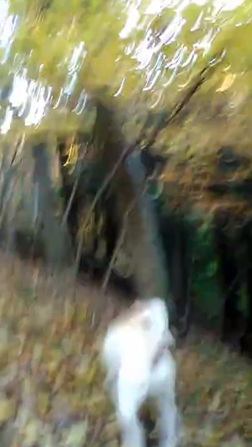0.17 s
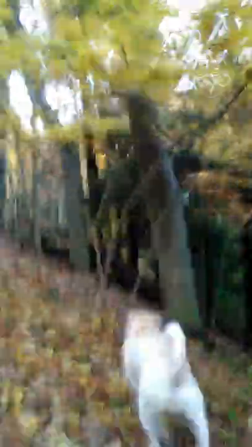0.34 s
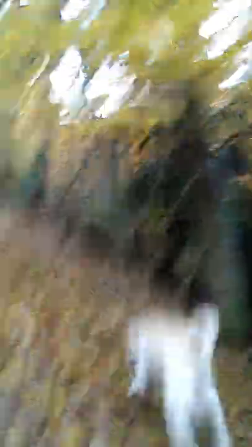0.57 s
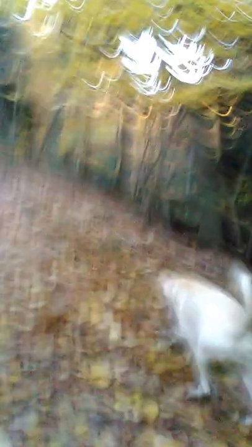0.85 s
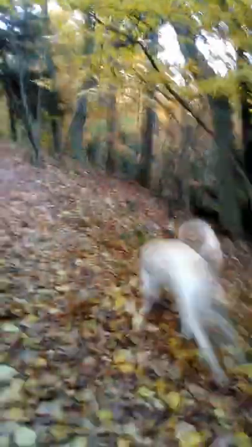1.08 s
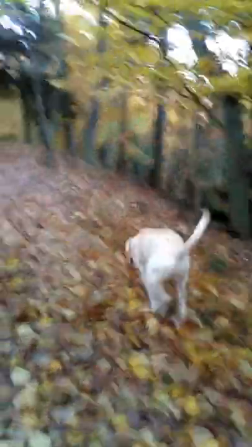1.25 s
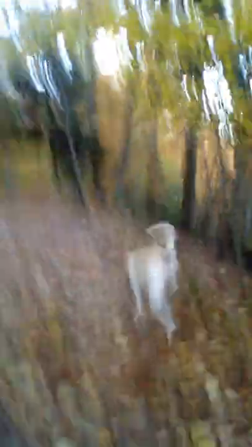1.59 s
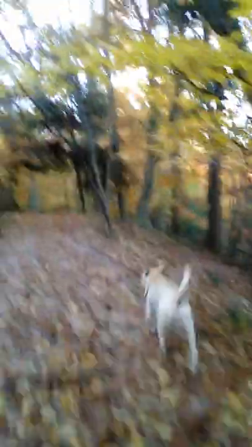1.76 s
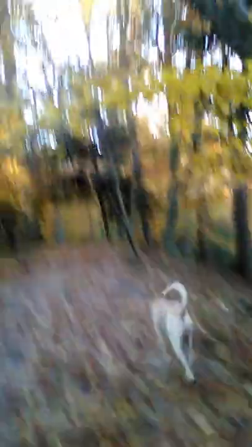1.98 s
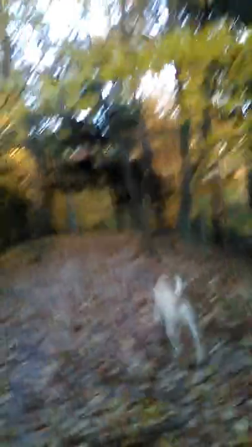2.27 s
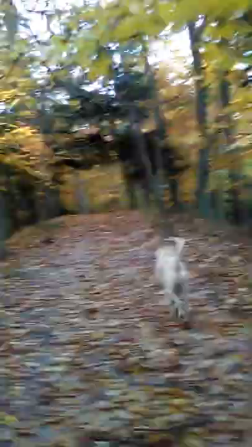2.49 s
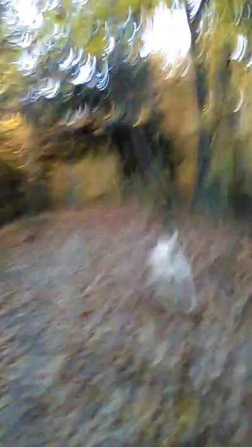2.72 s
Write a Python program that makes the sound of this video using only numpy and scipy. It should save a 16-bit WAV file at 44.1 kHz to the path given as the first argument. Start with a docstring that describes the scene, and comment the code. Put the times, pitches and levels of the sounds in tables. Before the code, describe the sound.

Someone walks briskly through crisp leaf litter outdoors, each step crackling and sliding; twigs tick, one snaps sharply, cloth rubs and squeaks near the end, all close to a handheld camera microphone with little background.

```python
"""On a woodland path, a walker treads through dry fallen leaves with a small camera in hand.
Each footfall crushes and drags leaves: a swell of tiny clicks, short rings and sliding noise.
Twigs tick as short pitched noise, and one snaps close by in a run of clicks.
Something, probably a sleeve, rubs in grainy strokes and squeaks; a thin tone of narrow noise rasps.
The camera takes soft damped bumps and whines faintly, over the still air's quiet filtered noise."""
import sys
import numpy as np
from scipy import signal
from scipy.fft import rfft, irfft
from scipy.io import wavfile
from scipy.ndimage import map_coordinates

SR = 44100
rng = np.random.default_rng(int(sys.argv[2]) if len(sys.argv) > 2 else 0)


def file_out(sig):
    """Save sig as 16-bit WAV at sys.argv[1]."""
    # one column per channel
    cols = np.atleast_2d(sig).T
    # limit, then scale
    lim = np.clip(cols, -1, 1)
    pcm = np.round(lim * 32767).astype(np.int16)
    wavfile.write(sys.argv[1], SR, pcm)


N = 125685  # length in samples


def undb(db):
    """Turn decibels into a gain."""
    return 10 ** (np.asarray(db) / 20)


def unit(x):
    """Scale to an average strength (rms) of 1."""
    return x / np.sqrt(np.mean(x ** 2))


def noise():
    """Plain hiss, equally strong at all pitches."""
    return rng.standard_normal(N)


def gains(points):
    """Read a (Hz, dB) curve as a gain at every frequency."""
    hz, db = np.array(points, float).T
    all_hz = np.arange(N + 1) * SR / (2 * N)
    return undb(np.interp(np.log(all_hz + 1), np.log(hz), db))


def colour(x, points):
    """Give a sound the tone of a curve, never sounding before its cause; a click keeps its energy."""
    # Folding the log spectrum in time gives the filter that responds as early as possible.
    folded = irfft(np.log(unit(gains(points))))
    folded[1:N] *= 2
    folded[N + 1:] = 0
    return irfft(rfft(x, 2 * N) * np.exp(rfft(folded)))[:N]


def resonate(x, hz, width_hz):
    """Let a sound ring around one pitch, by passing it twice through a resonance."""
    b, a = signal.iirpeak(min(hz, SR / 3), hz / width_hz, fs=SR)
    once = signal.lfilter(b, a, x)
    return signal.lfilter(b, a, once)


def walk(rate_hz):
    """Random drift of rms 1: straight lines between random points, rate_hz points per second."""
    points = rng.standard_normal(N // 20)
    return unit(np.interp(np.arange(N) * rate_hz / SR, np.arange(len(points)), points))


def cracks(per_s, spread_db):
    """Random tiny clicks; a positive spread makes a few stand out, a negative one makes a few weaker."""
    size = undb(spread_db * np.minimum(rng.exponential(size=N), 6))
    happens = rng.random(N) < per_s / SR
    return unit(happens * size * rng.choice([-1, 1], N))


def swell(t, peak, rise, fall):
    """Loudness shape: a rounded rise, then an exponential fall."""
    before, after = np.minimum(t - peak, 0), np.maximum(t - peak, 0)
    return np.exp(-(before / rise) ** 2 - after / fall)


def strokes(t, grain, rows, split_hz):
    """Swells of a grainy sound, each with its own balance above and below the split."""
    low = signal.sosfiltfilt(signal.butter(2, split_hz, fs=SR, output="sos"), grain)
    out = 0
    for part, sign in ((low, -1), (grain - low, 1)):
        power = 0
        for peak, rise, fall, db, bright in rows:
            loudness = swell(t, peak, rise, fall) * undb(db + sign * bright / 2)
            # The cosh stops a strong tilt from making the stroke louder.
            power = power + loudness ** 2 / np.cosh(bright * np.log(10) / 20)
        out = out + part * np.sqrt(power)
    return out


def patchy(x, depth_db, patch_hz, patch_s):
    """Neighbouring bands swell and sink on their own as the contact changes."""
    f, s, spec = signal.stft(x, SR, nperseg=256)
    places = np.meshgrid(f / patch_hz, s / patch_s, indexing="ij")
    field = map_coordinates(rng.standard_normal((128, 400)), places, order=1, mode="wrap")
    return unit(signal.istft(spec * undb(depth_db * field), SR)[1][:N])


# Footfalls and crunches in the leaves. Each row: peak in seconds, rise in seconds, fall in seconds,
# level in dB, brightness (high part over low part) in dB.
FOOTFALLS = [(0.01, 0.06, 0.27, -60.5, -11.5), (0.386, 0.095, 0.071, -47, -3.5), (0.56, .12, 0.24, -54, 4),
             (0.827, 0.1, 0.085, -48, 2.5), (0.958, 0.046, 0.11, -48, 3.5), (1.20, 0.037, 0.08, -58, 16),
             (1.354, 0.023, 0.3, -59, 4), (1.521, 0.073, 0.18, -49.5, -7.5),
             (1.545, 0.015, 0.018, -42.5, -8), (1.70, 0.1, 0.3, -55, 0), (1.842, 0.043, 0.074, -40, -5),
             (2.009, 0.095, 0.12, -44, 3), (2.144, 0.095, 0.09, -42.5, -9), (2.341, 0.026, 0.3, -56.5, 15),
             (2.492, 0.051, 0.095, -49.5, -3.5), (2.587, 0.034, 0.047, -48, 2),
             (2.721, 0.048, 0.16, -55.5, 1), (2.84, 0.055, 0.11, -54, 10.5)]
# Tone of crushed leaves. Each row: frequency in Hz, relative strength in dB per Hz.
LEAF_TONE = [(300, -29), (700, -25), (1100, -12), (1700, -17), (2400, -18), (3200, -16.5), (3650, -16),
             (4400, 0), (5500, -1), (7500, 2.5), (9500, -3), (11000, -5.5), (14000, -19)]
CRACKS_PER_S, CRACK_SPREAD_DB = 5000, -1.5
SLIDE_DB, LEAF_RING_DB = 4, -4  # both compared with the cracks
LEAF_SPLIT_HZ = 6970


def leaves(t):
    """Leaves crack in clumps, flick and slide over each other under each foot."""
    grain = cracks(CRACKS_PER_S, CRACK_SPREAD_DB)
    grain = grain + undb(LEAF_RING_DB) * rings(t) + undb(SLIDE_DB) * noise()
    flickering = grain * undb(0.94 * walk(70))  # drift in dB, 70 points per second
    crushed = patchy(colour(flickering, LEAF_TONE), depth_db=3.1, patch_hz=639, patch_s=.022)
    return strokes(t, crushed, FOOTFALLS, LEAF_SPLIT_HZ)


LEAF_RING_S, LEAF_RINGS_PER_S, LEAF_RING_SPREAD_DB = 0.0019, 1100, 2.5  # average fade time first
LEAF_RING_LOW_HZ, LEAF_RING_HIGH_HZ = 700, 14200


def rings(t):
    """Single leaves flick, each ringing for a moment at its own pitch."""
    out, u = np.zeros(N + 512), np.arange(512) / SR
    flicks = rng.random((12000, 5))
    for at, pitch, strength, length, chance in flicks:
        # Only enough of the possible flicks sound to give the wanted rate.
        if chance < LEAF_RINGS_PER_S * t[-1] / len(flicks):
            hz = LEAF_RING_LOW_HZ + (LEAF_RING_HIGH_HZ - LEAF_RING_LOW_HZ) * pitch
            size = undb(-LEAF_RING_SPREAD_DB * np.log(max(strength, .01)))
            fade = np.exp(-u / (LEAF_RING_S * (.5 + length)))
            start = int(at * N)
            out[start:start + len(u)] += size * fade * np.sin(2 * np.pi * hz * u)
    return unit(out[:N])


# Twigs and stalks. Each row: time in seconds, relative level in dB, pitch in Hz.
TWIG_TICKS = [(0.122, -27, 6060), (0.1523, -22.5, 6760), (0.16, -32, 5960), (0.3157, -15, 7200),
              (0.347, -13, 5640), (0.385, -13, 5830), (0.395, -12.5, 5200), (0.772, -17.5, 4660),
              (0.8091, -41, 8000), (0.904, -22, 7560), (1.349, -35, 5140), (1.427, -22.5, 5900),
              (1.455, -23.5, 5000), (1.517, -12.5, 4550), (1.604, -18.5, 6830), (2.2068, -12.5, 8300),
              (2.214, -14, 6000)]
TICK_RISE_S, TICK_FALL_S, TICK_WIDTH = 0.0017, .003, 0.36  # width is a share of the pitch


def twigs(t):
    """Stalks break with a short pitched tick: a burst of noise through a resonance."""
    out = 0
    for s, db, hz in TWIG_TICKS:
        tick = swell(t, s, TICK_RISE_S, TICK_FALL_S) * noise() / np.sqrt(TICK_FALL_S * SR)
        out = out + undb(db) * resonate(tick, hz, hz * TICK_WIDTH) * 2
    return out


def burst(t, s, fall):
    """A brief dying crackle of noise with energy near 1."""
    return noise() * (t >= s) * np.exp(-np.abs(t - s) / fall) * np.sqrt(2 / (fall * SR))


# Fibres giving way in the close snap. Each row: time in seconds, relative level in dB.
FIBRES = [(0.7193, 0), (0.7201, -5), (0.7216, -6), (0.7230, -5), (0.7257, -9), (0.7271, -14)]
# Tone of the snap. Each row: frequency in Hz, relative strength in dB per Hz.
SNAP_TONE = [(300, -48), (500, -31), (700, -11.5), (1000, -15), (1320, -4.5), (1600, -13), (1900, -5.5),
             (2220, -11), (2600, -29), (3800, -26), (5000, -10), (6200, -3.5), (7300, 3.5), (8500, -4.5),
             (9500, -14.5), (12000, -15.5), (14000, -24)]
SNAP_DB = -8.5  # turns down the fibres, tails and strain together
SNAP_TAIL_DB, SNAP_TAIL_S = -10, .003  # tail compared with its fibre's click
STRAIN_DB, STRAIN_S = -47, .004  # same time for rise and fall
KNOCK_AT_S, KNOCK_DB, KNOCK_HZ, KNOCK_WIDTH_HZ = .7304, -28.5, 1350, 1500


def snap(t):
    """A close snap: the twig strains, a few fibres break in quick succession, then a dull knock."""
    first_break = FIBRES[0][0]
    breaks = undb(STRAIN_DB) * swell(t, first_break, STRAIN_S, STRAIN_S) * noise()
    for s, db in FIBRES:
        breaks[int(s * SR)] += undb(db)
        breaks += undb(db + SNAP_TAIL_DB) * burst(t, s, SNAP_TAIL_S)
    click = 1. * (np.arange(N) == int(KNOCK_AT_S * SR))
    knock = resonate(click, KNOCK_HZ, KNOCK_WIDTH_HZ)
    knock = knock / np.sqrt(np.sum(knock ** 2))
    return undb(SNAP_DB) * colour(breaks, SNAP_TONE) + undb(KNOCK_DB) * knock


# Rubbing strokes. Each row: peak in seconds, rise in seconds, fall in seconds, level in dB,
# brightness (high part over low part) in dB.
RUB_STROKES = [(0.021, 0.11, 0.05, -52.5, -12), (0.13, 0.08, 0.046, -63, 22),
               (0.181, .015, 0.022, -45.5, -21), (0.306, 0.04, 0.04, -58, -3.5),
               (0.51, 0.022, 0.043, -56, -10.5), (0.59, 0.033, .04, -54, -10.5),
               (0.82, 0.12, 0.15, -54, -12.5), (0.965, .025, 0.094, -52, 0),
               (1.227, 0.017, 0.018, -58, -29), (1.351, 0.0046, 0.013, -55, -6),
               (1.52, 0.15, 0.24, -63, 20), (1.609, 0.034, 0.048, -53.5, -5),
               (1.735, 0.054, 0.16, -56.5, 19), (1.835, 0.044, 0.074, -47, 26),
               (1.888, 0.026, 0.068, -42, 0.5), (2.19, 0.056, 0.072, -51, 33), (2.84, .02, 0.039, -58, -18)]
# Tone of the rubbing. Each row: frequency in Hz, relative strength in dB per Hz.
RUB_TONE = [(300, -33), (700, -27), (950, -1.5), (1250, 0.5), (1500, -4), (1720, -28.5), (2200, 4),
            (2900, -1), (3300, -1.5), (3650, -18), (6000, -21.5)]
RUB_SPLIT_HZ, RUB_CATCHES_PER_S, RUB_SPREAD_DB = 1130, 2500, 2


def rubbing(t):
    """Cloth catches and slips in many tiny clicks; the hardest stroke sings and squeaks."""
    catches = colour(cracks(RUB_CATCHES_PER_S, RUB_SPREAD_DB), RUB_TONE)
    cloth = patchy(catches, depth_db=6.9, patch_hz=260, patch_s=.03)
    return strokes(t, cloth, RUB_STROKES, RUB_SPLIT_HZ) + scrape(t) + squeaks(t)


# Resonance of the hardest rubbing stroke. Each row: time in seconds, centre in Hz, level in dB.
SCRAPE_PATH = [(1.60, 2800, -79), (1.70, 2700, -56.5), (1.735, 2450, -52.5), (1.775, 2700, -58.5),
               (1.811, 2800, -49.5), (1.836, 2950, -43.5), (1.861, 2600, -50), (1.883, 2250, -50),
               (1.918, 1950, -40), (1.95, 1900, -81)]
SCRAPE_WIDTH_HZ = 250


def scrape(t):
    """The hardest stroke sings in a sliding resonance: two random drifts carried on one pitch."""
    when, centre_hz, level_db = np.array(SCRAPE_PATH).T
    phase = 2 * np.pi * np.cumsum(np.interp(t, when, centre_hz)) / SR
    tone = walk(SCRAPE_WIDTH_HZ) * np.sin(phase) + walk(SCRAPE_WIDTH_HZ) * np.cos(phase)
    return undb(np.interp(t, when, level_db, -np.inf, -np.inf)) * tone


# Squeaks. Each row: centre in seconds, half length in seconds, pitch at the centre in Hz,
# glide in Hz per second, level in dB.
SQUEAK_ROWS = [(1.9087, 0.0022, 2040, 0, -31), (1.912, 0.0016, 1934, 20000, -35),
               (1.921, 0.0049, 2290, 130000, -33), (1.928, 0.0047, 1220, -20000, -46)]


def squeaks(t):
    """Short gliding tones, roughened by a random shake of their phase."""
    out = 0
    for s, length, hz, glide, db in SQUEAK_ROWS:
        u = t - s
        phase = 2 * np.pi * (hz * u + glide * u ** 2 / 2) + 0.33 * walk(1500)
        out = out + undb(db) * np.exp(-(u / length) ** 2) * np.sin(phase)
    return out


# Level of the thin rasping tone. Each row: time in seconds, level in dB.
RASP_LEVEL = [(1.95, -110), (2.05, -66), (2.12, -52.5), (2.16, -41.5), (2.22, -45.5), (2.282, -53),
              (2.295, -41), (2.315, -45.5), (2.36, -58), (2.44, -55), (2.58, -61.5), (2.70, -67),
              (2.78, -85)]
RASP_HZ, RASP_WIDTH_HZ = 2270, 230
RASP_FLUTTER_DB, RASP_FLUTTER_HZ = 0.6, 95


def rasp(t):
    """A narrow, fluttering tone, made from resonant noise, swells and dies away."""
    tone = resonate(noise(), RASP_HZ, RASP_WIDTH_HZ) * undb(RASP_FLUTTER_DB * walk(RASP_FLUTTER_HZ))
    when, level_db = np.array(RASP_LEVEL).T
    return unit(tone) * undb(np.interp(t, when, level_db))


# Soft bumps on the camera and heel thuds. Each row: centre in seconds, strength in dB,
# pitch in Hz, half length in seconds.
SOFT_BUMPS = [(0.272, -36, 286, 0.0018), (0.2785, -32, 328, 0.0017), (0.2883, -25, 322, 0.0038),
              (0.295, -30.5, 368, 0.0058), (0.309, -31.5, 300, 0.0037), (0.311, -48.5, 820, 0.0056),
              (0.66, -55.5, 376, 0.0019), (1.261, -61, 62, 0.013), (1.514, -64.5, 49.5, 0.017),
              (2.129, -54.5, 490, 0.0054), (2.457, -69, 56, 0.0072), (2.681, -41.5, 212, 0.0042)]


def bumps(t):
    """Soft, heavily damped knocks: a low tone that lasts only a moment."""
    out = 0
    for s, db, hz, length in SOFT_BUMPS:
        u = t - s
        out = out + undb(db) * np.exp(-(u / length) ** 2) * np.sin(2 * np.pi * hz * u)
    return out


# The hand shifts on the camera. Each row: peak in seconds, rise in seconds, fall in seconds, level in dB.
HAND_SHIFTS = [(.03, 0.11, .15, -77.5), (0.292, 0.013, 0.0092, -42), (0.309, 0.0039, 0.0044, -39.5),
               (.33, 0.046, 0.12, -57.5), (.66, 0.011, 0.21, -72.5), (2.128, 0.024, 0.088, -68.5),
               (2.70, .015, 0.06, -75.5)]
# Tone of the camera shell. Each row: frequency in Hz, relative strength in dB per Hz.
SHELL_TONE = [(60, -31), (120, -2), (160, 5.5), (210, -4.5), (270, -0.5), (370, 0.5), (440, -5.5), (500, 3),
              (580, -11), (670, -2), (760, -12), (910, 0.5), (1100, -34.5), (1800, -41), (4000, -57)]
SHELL_KNOCKS_PER_S, SHELL_SPREAD_DB = 1200, 2.2


def jostles(t):
    """The shifting hand shakes the camera shell with many tiny knocks."""
    shake = sum(undb(db) * swell(t, s, rise, fall) for s, rise, fall, db in HAND_SHIFTS)
    return shake * unit(colour(cracks(SHELL_KNOCKS_PER_S, SHELL_SPREAD_DB), SHELL_TONE))


WHINE_DB, WHINE_HZ = -77.5, 13512


def whine():
    """A faint high electronic whine from the camera: a sine whose pitch wavers by a few Hz."""
    pitch_hz = WHINE_HZ + 9 * walk(30)
    return undb(WHINE_DB) * np.sqrt(2) * np.sin(2 * np.pi * np.cumsum(pitch_hz) / SR)


# Tone of the still air of the wood. Each row: frequency in Hz, relative strength in dB per Hz.
AIR_TONE = [(25, -6), (45, -12.5), (65, 4.5), (100, -8), (160, -5.5), (250, -13), (500, -12.5),
            (1000, -9.5), (1700, -17), (2500, -6.5), (3600, -29.5), (5000, -33), (8000, -8.5),
            (14000, -21.5)]
AIR_DB = -68.5


def air():
    """Quiet outdoor background: steady filtered noise."""
    return undb(AIR_DB) * unit(colour(noise(), AIR_TONE))


# Spread between the ears. Each row: frequency in Hz, side level compared with the middle in dB.
EAR_SPREAD = [(40, -68), (3700, -58), (4300, -30), (4700, -12), (6000, -12), (7300, -5), (10000, -4.5),
              (13000, -4), (14300, -6)]


def scene():
    """Everything is central except the treble of leaves, twigs and air."""
    t = np.arange(N) / SR
    mid = leaves(t) + twigs(t) + snap(t) + rubbing(t) + rasp(t)
    mid = mid + bumps(t) + jostles(t) + whine() + air()
    # Fresh random draws of the same events make the two ears differ.
    spread = leaves(t) + twigs(t) + air()
    side = irfft(rfft(spread, 2 * N) * gains(EAR_SPREAD))[:N]
    return np.array([mid + side, mid - side])


TOP_HZ = 14250


def record(dry):
    """The camera cuts the top with a steep low-pass filter."""
    return signal.sosfilt(signal.ellip(10, .2, 70, TOP_HZ, fs=SR, output="sos"), dry)


dry = scene()
out = record(dry)
file_out(out)
```